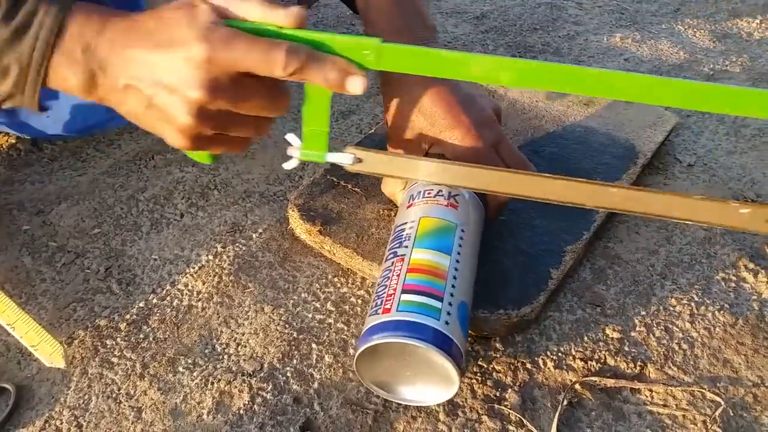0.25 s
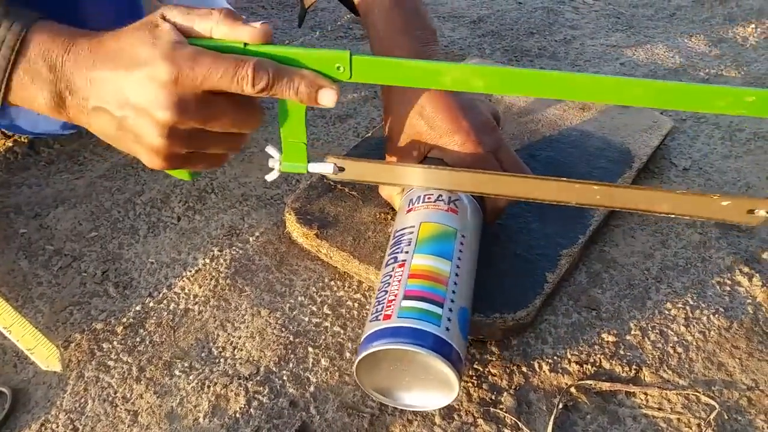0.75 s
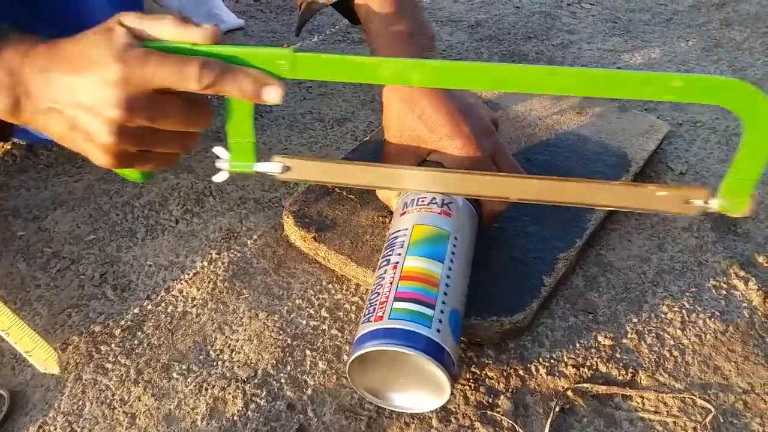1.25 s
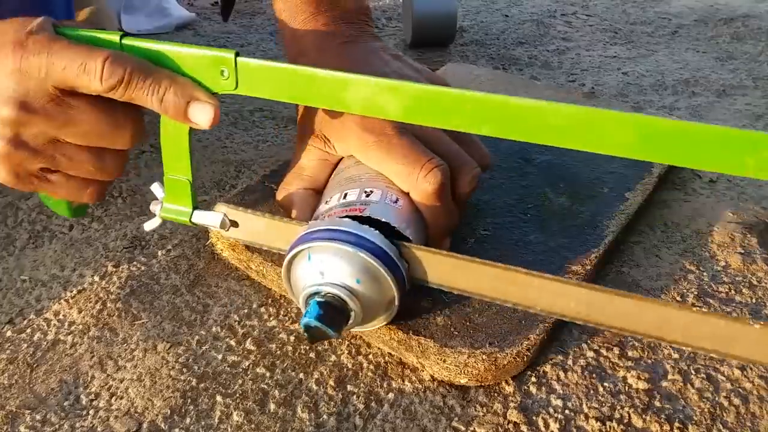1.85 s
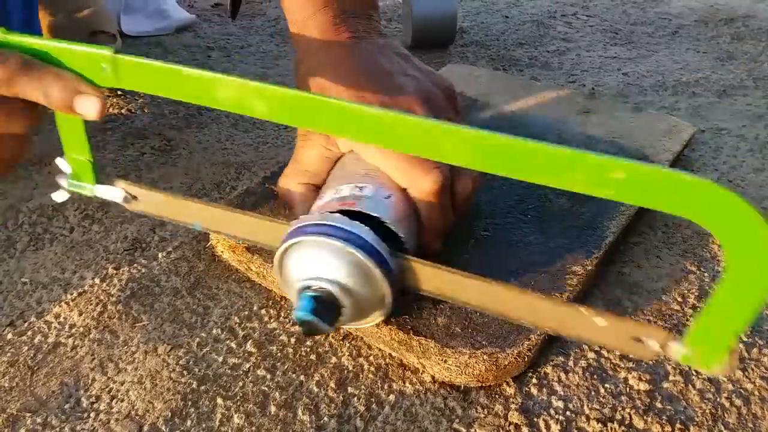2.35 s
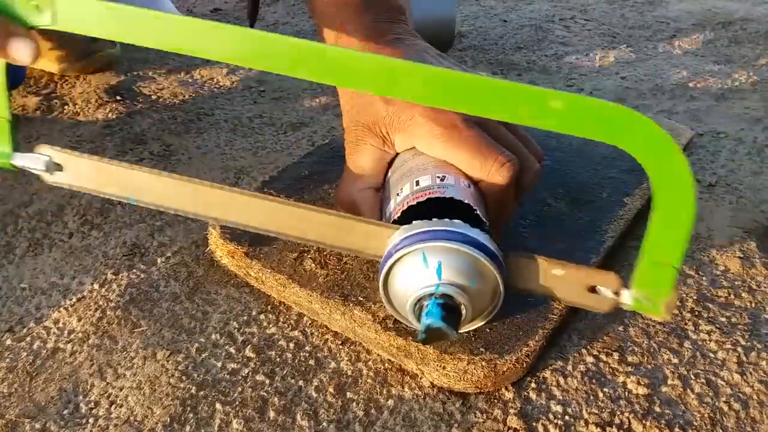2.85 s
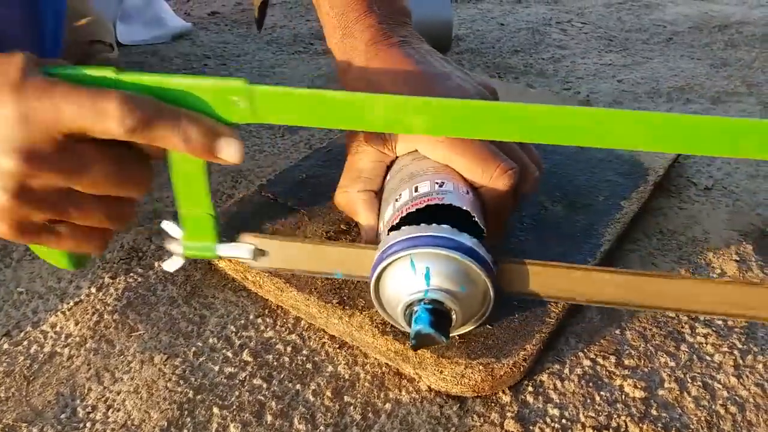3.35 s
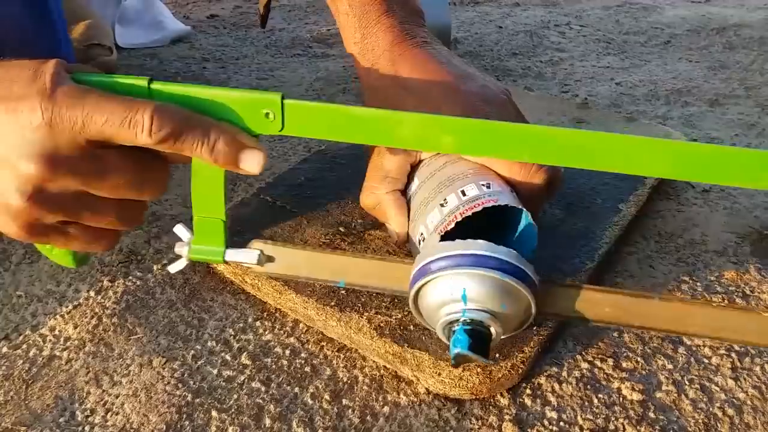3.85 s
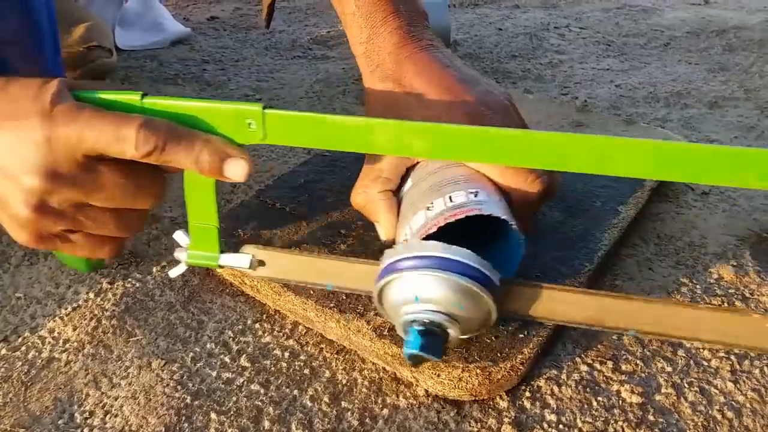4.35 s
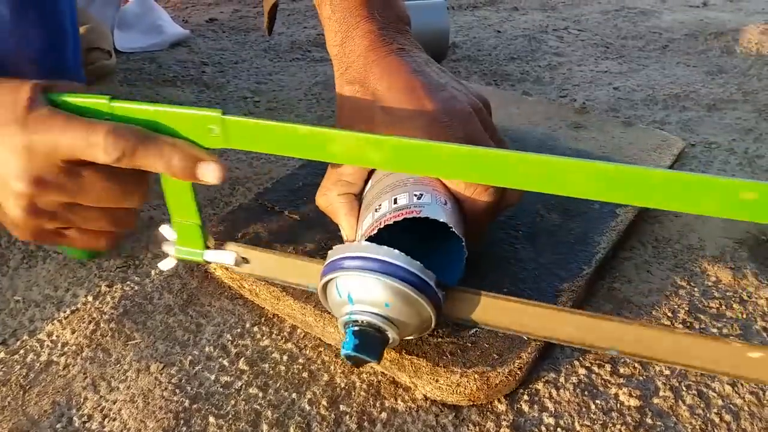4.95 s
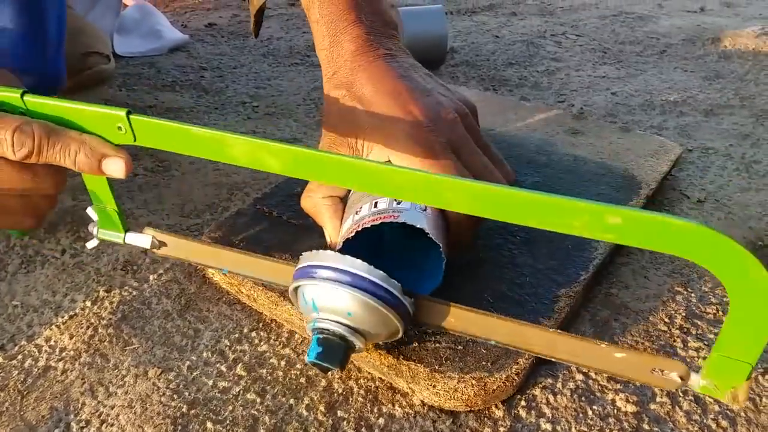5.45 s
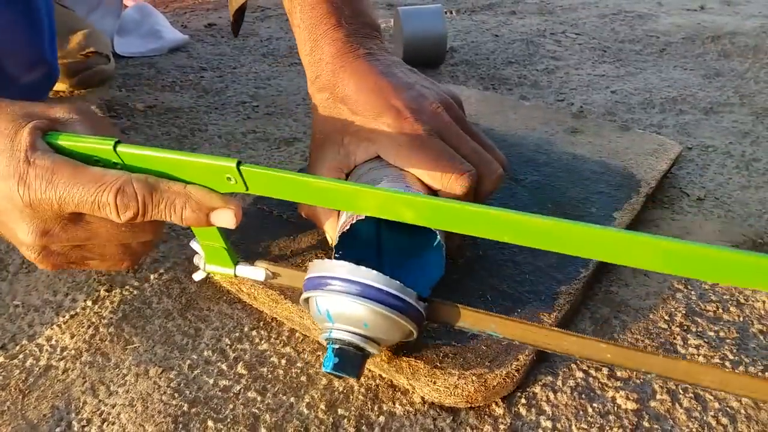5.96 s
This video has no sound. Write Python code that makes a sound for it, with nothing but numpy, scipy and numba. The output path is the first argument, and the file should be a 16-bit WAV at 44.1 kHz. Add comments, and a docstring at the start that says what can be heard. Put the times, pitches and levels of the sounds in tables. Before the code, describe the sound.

A hacksaw rasps back and forth through a thin, empty metal can outdoors, bright scraping turning to louder strokes with a hollow, hooting ring.

```python
"""A hacksaw rasps through an empty aluminium can in quick strokes, a bright scrape ringing a thin shell.
The rasp is noisy tooth force driving the can's resonances: closed, then slit, then gaping. Once it is open,
the air inside hoots at a mostly rising pitch, made by a wavering sine and a resonator that the teeth roughen.
Noise bursts make the knocks of the blade; torn edges crinkle, the right microphone rumbles with overload in
the hardest strokes, and air hushes behind."""
import sys
import numpy as np
from scipy import signal
from scipy.fft import rfft, irfft
from scipy.io import wavfile
from numba import njit

SR = 44100
rng = np.random.default_rng(int(sys.argv[2]) if len(sys.argv) > 2 else 0)


def dump_mix(stems):
    """Bounce the given channels to the path in sys.argv[1] as a 16-bit WAV at rate SR."""
    frames = np.atleast_2d(stems).T  # one column per channel
    limited = np.clip(frames, -1, 1)  # hard clip at full scale
    pcm = np.round(limited * 32767).astype(np.int16)
    wavfile.write(sys.argv[1], SR, pcm)


N = 274302
TIME = np.arange(N) / SR
TAPS = 8192  # length of the shell response before trimming, samples
STROKE_ROOM_S = .34  # each stroke is worked out for this long

# saw strokes in the open cut, levels before the trims of sawing():
# start_s, attack_s, length_s (until it slows), release_t60_s, rasp_db, scrape_db (re rasp),
# hiss_db (re rasp), chatter_db, hoot_db (during the stroke), slowing_hoot_db (as the blade slows)
OPEN_STROKES = [ (1.687, 0.0049, 0.021, 0.23, -59, 6.5, -7, 1.8, -58, -75),
                (1.721, 0.0019, 0.063, 0.039, -32, -7.5, -13, 4, -51.5, -42),
                (1.893, 0.0061, 0.13, 0.073, -29, -6.5, -7.5, 2.7, -39.5, -48),
                (2.102, 0.011, .13, 0.097, -29, -9, -9.5, 1.5, -39, -35),
                (2.298, 0.0018, 0.036, 0.073, -49.5, 0, -8, 3, -48.5, -52),
                (2.356, 0.0048, 0.074, 0.086, -31.5, -4.5, -5, 3.6, -41.5, -41),
                (2.465, 0.0019, 0.014, 0.042, -35.5, -5, -18, 2, -48.5, -50),
                (2.543, 0.01, 0.084, .05, -30.5, -3, -11, 2.8, -36.5, -34),
                (2.688, 0.0068, 0.094, 0.097, -32, -8.5, -4.5, 0.65, -46.5, -36.5),
                (2.838, 0.0051, 0.15, 0.061, -30, -5.5, -7.5, 0.6, -43.5, -31.5),
                (3.078, 0.0099, 0.13, .08, -31.5, -6, -6.5, 1.4, -37.5, -88),
                (3.237, 0.0029, 0.17, 0.084, -30.5, -3.5, -7, 1.7, -42.5, -36.5),
                (3.493, .004, 0.093, 0.12, -29.5, -6, -8.5, 2.1, -40, -39.5),
                (3.635, .015, 0.041, 0.31, -41, -5, -4, 4, -42.5, -37),
                (3.711, .008, .14, 0.07, -27, -8.5, -12.5, 2, -34.5, -32),
                (3.934, 0.0088, .02, 0.055, -40.5, -17, -7, 2.5, -53, -45),
                (3.962, .004, 0.085, 0.052, -30.5, -7, -10.5, 0.93, -54.5, -32.5),
                (4.086, 0.0089, 0.029, 0.1, -35.5, -29.5, -14, 6.1, -35.5, -59),
                (4.157, 0.0024, .14, 0.091, -27.5, -8, -12.5, 1.8, -40.5, -30),
                (4.432, 0.004, 0.07, 0.067, -49.5, -13, -8.5, 2.5, -53, -39),
                (4.467, 0.0058, 0.059, 0.059, -33, -4, -11, 4.6, -36, -35.5),
                (4.682, 0.016, 0.076, 0.077, -38, -18, -19, 6.4, -46, -39),
                (4.896, 0.018, 0.14, 0.11, -32, -13, -8.5, 0.55, -38, -32.5),
                (5.126, 0.036, .045, 0.042, -41.5, -1, -7, 3, -46.5, -38.5),
                (5.187, 0.0093, 0.028, 0.06, -33, 0, -10.5, 2.8, -43, -46),
                (5.228, 0.0042, 0.066, 0.11, -39, -1.5, -10.5, 2.1, -37.5, -30.5),
                (5.511, .006, 0.016, 0.2, -42.5, -1, -10, 1.9, -44, -36),
                (5.552, 0.011, .108, 0.075, -30.5, -10, -6, 1.6, -38.5, -42.5), ]
# the blade knocks or snags: start_s, ring_db (before the trims of knocks()), hiss_db (re ring), cavity_thump_db
KNOCKS = [(0.141, -13.5, 1.5, -73), (.229, -37, -14, -74), (0.915, -10.5, -7, -72),
          (1.131, -28.5, 7.5, -67), (1.216, -16, -5.5, -68), (1.437, -11, -1, -76), (1.58, -15, -6, -75),
          (1.669, -19, -8.5, -57), (1.727, -9, -17, -36.5), (1.778, -14, -12.5, -40), (1.83, -20, -11, -58),
          (1.895, -14, -9.5, -59), (2.079, -20, -8.5, -38.5), (2.102, -12.5, -16.5, -62),
          (2.362, -3.5, -20.5, -53), (2.506, -5, -11.5, -41.5), (3.037, -21, -2.5, -44),
          (3.067, -15, -1, -47), (3.237, -14.5, -3.5, -44.5), (3.451, -7.5, -11, -42),
          (3.494, -20.5, 1.5, -36), (3.656, -11.5, -4, -31), (3.899, -31, -4, -49),
          (3.963, -7.5, -38, -31.5), (4.08, -12.5, -14, -50), (4.351, -26.5, -8, -50),
          (4.38, -33.5, -10, -47), (4.417, -11, -17, -30), (4.563, -14.5, -5, -69), (4.622, -26.5, -4, -59),
          (4.664, -27.5, -10, -62), (4.692, -15.5, -19, -41), (4.743, -21.5, -4, -70),
          (4.854, -37.5, -12, -61), (4.898, -22.5, -15, -58), (5.156, -13, -18.5, -43),
          (5.321, -21, -8.5, -40.5), (5.467, -47.5, -17, -75), (5.517, -16.5, -24, -52),
          (5.846, -35.5, -10.5, -67), (5.949, -53, -13, -79), (5.985, -58, -10, -82),
          (6.04, -58, -10, -83.5), (6.145, -16.5, -11.5, -37), (6.212, -20.5, -10, -52)]
# hardest part of the stroke: middle_s, length_s, rumble_db (before the left and right trims)
HARD_PARTS = [(1.973, 0.094, -48.5), (2.183, 0.097, -45), (2.389, 0.082, -36.5), (2.744, 0.08, -40),
              (2.924, 0.2, -35.5), (3.16, 0.073, -45), (3.347, 0.11, -35.5), (3.781, 0.18, -36),
              (4.229, 0.19, -34), (4.492, 0.045, -45.5), (4.969, 0.19, -46), (5.618, 0.1, -38.5)]


def sawing(strokes, arch_db, scrape_trim_db, rasp_trim_db, hiss_trim_db, whine_db):
    """Stroke after stroke of tooth force rings the shell; returns the sound and the force."""
    hard_scrape_db, hard_whine_db = 3, 10.5  # the hardest part has a stronger scrape and more whine
    hiss_decay = 1.56  # the hiss dies sooner than the rasp: ratio of decay rates
    out, force, hard = np.zeros((2, N)), np.zeros(N), hardness()
    t = np.arange(int(STROKE_ROOM_S * SR)) / SR
    for start_s, attack_s, length_s, t60, db, scrape_db, hiss_db, chatter_db, *_ in strokes:
        hard_now = np.interp(start_s + t, TIME, hard)
        gain = stroke(t, attack_s, length_s, t60, arch_db)
        hz = tooth_rate(t, start_s, length_s)
        push = teeth(hz, chatter_db, whine_db + hard_whine_db * hard_now)
        add(force, start_s, push * gain)
        scrape_gain = gain * undb(scrape_db + scrape_trim_db + hard_scrape_db * hard_now)
        rasp_gain = gain * undb(rasp_trim_db)
        hiss_gain = gain ** hiss_decay * undb(hiss_db + hiss_trim_db)
        for response, part in zip(can_at(start_s), (scrape_gain, rasp_gain, hiss_gain)):
            add(out, start_s, undb(db) * signal.fftconvolve([push * part], response, axes=1))
    return out, force


def teeth(hz, judder_db, whine_db, jitter=.05, judder_hz=100, uneven_db=2.5, catch=0.38, slide=.25,
          grit_db=3, snap_db=-8, burr_db=-9, burr_spread_db=5.5):
    """Force of one stroke: each tooth snaps free and tears a gritty chip; together they whine at the tooth rate."""
    count = len(hz)
    # the thin wall flexes: where it grips harder, the blade slows
    judder = waver(count, judder_hz)
    phase = np.cumsum(np.abs(hz * (1 - jitter * judder))) / SR
    tooth = phase.astype(int)
    tooth_gain = undb(uneven_db * rng.standard_normal(count))[tooth]
    bite = tooth_gain * undb(judder_db * judder)
    # each chip starts hard and eases into a slide; catch is a fraction of the tooth spacing
    grit = rng.standard_normal(count) * undb(grit_db * rng.standard_normal(count))
    chip = (slide + np.exp(-(phase % 1) / catch)) * grit
    snap = np.diff(tooth, prepend=0) * np.sqrt(SR / hz)
    whine = np.sqrt(2) * np.cos(2 * np.pi * phase)
    # burrs crack as the teeth snap free, a few of them much more sharply
    burr = snap * undb(burr_spread_db * np.minimum(rng.exponential(size=count), 3.8))
    centred_snap = snap - np.sqrt(hz / SR)
    cutting = unit(chip) + undb(snap_db) * centred_snap + undb(whine_db) * whine
    return unit(unit(bite * cutting) + undb(burr_db) * unit(burr))


def stroke(t, attack_s, length_s, t60, arch_db):
    """Gain of one stroke: the blade gets going, swells to the middle and slows to rest."""
    arch = undb(-arch_db * (2 * np.minimum(t / length_s, 1) - 1) ** 2)
    release = np.exp(-np.log(1000) * np.maximum(t - length_s, 0) / t60)
    return np.clip(t / attack_s, 0, 1) * arch * release


def tooth_rate(t, start_s, length_s, coast_s=.2, skew=1.45):
    """Teeth passing per second: the blade gathers speed, slows more quickly and coasts down."""
    # fastest rate at which teeth pass the wall in a full stroke: time_s, rate_hz
    full_rate = [(0, 690), (1.5, 717.7), (2.2, 1153), (2.9, 1273), (3.35, 1261), (4.2, 998.6),
                 (4.95, 771.3), (5.6, 771)]
    turn_hz = 471.1  # rate as the blade starts or slows
    full_stroke_s = .13  # shorter strokes never reach full speed
    full_hz = np.interp(start_s + length_s / 2, *np.transpose(full_rate))
    gain_hz = (full_hz - turn_hz) * min(length_s / full_stroke_s, 1)
    arc = np.sin(np.pi * np.minimum(t / length_s, 1) ** skew)
    return (turn_hz + gain_hz * arc) * np.exp(-np.maximum(t - length_s, 0) / coast_s)


def hardness():
    """Rises from 0 to 1 and back over the hardest part of each listed stroke."""
    return sum(swell(middle_s, length_s) for middle_s, length_s, _ in HARD_PARTS)


def swell(middle_s, length_s):
    """A smooth rise to 1 and back."""
    return np.cos(np.pi * np.clip((TIME - middle_s) / length_s, -.5, .5))


def can_at(s):
    """The shell as it rings at time s: closed, slit, then gaping as the top is nearly severed."""
    # radiation of the shell: frequency_hz, left_db, right_db
    closed_colour = [(40, -9.5, -17), (128, -3, -5.5), (285, -10, -9), (487, -3.5, -7.5),
                     (613, -11.5, -11.5), (760, -5, -2.5), (920, -3.5, -12.5), (1360, -11.5, -5.5),
                     (2300, 0.5, 4), (4540, 0, 4.5), (6960, -15, -18), (9100, -13.5, -19),
                     (10900, -1.5, -12), (15700, -14, -13)]
    slit_colour = [(50, -8, -17), (291, -20, -19.5), (520, -19.5, -12.5), (730, -13, -14),
                   (920, -18.5, -15), (1480, -12.5, -12.5), (2390, -10.5, -3.5), (3070, -10.5, 2),
                   (4020, -22.5, 2.5), (4990, -20.5, -8), (6060, -23.5, -19), (7450, -22, -23.5),
                   (10800, -18.5, -19.5), (16000, -22, -25)]
    gaping_colour = [(50.33, -27, -23.5), (316, -21.5, -17), (564, -11.5, -8), (800, -9, -8.5),
                     (1000, -23.5, -11), (1510, -14, -13.5), (2370, -16, -10), (3065, -16, -6.5),
                     (4060, -21.5, 2), (5040, -22.5, -9.5), (5260, -19, -15), (7600, -25.5, -28.5),
                     (8450, -22.5, -22.5), (16000, -24, -30.5)]
    # shell resonances: frequency_hz (before detuning), width_hz, strength_db
    closed_modes = [(690, 54, 5), (1048, 31, 5.5), (1236, 72, 3.5), (1400, 67, 3), (1982, 87, 13),
                    (2576, 58, 6.5), (3020, 24, 3.5), (3710, 310, 2), (3680, 190, -12), (7680, 350, 2)]
    slit_modes = [(1181, 110, 1), (1816, 110, 2.5), (2395, 8.1, 3), (2667, 13, 9.5), (3234, 130, -5),
                  (3730, 150, 0), (4104, 76, 1), (4680, 330, 4.5), (7090, 340, 0.5)]
    gaping_modes = [(1214, 81, -6), (1453, 60, -0.5), (1780, 56, -5.5), (2460, 97, -4), (2630, 24, 6.5),
                    (2765, 15, 5.5), (3566, 83, -0.5), (3680, 540, -4), (4480, 210, -5), (4830, 55, -3.5),
                    (7110, 59, 3.5)]
    slit_s, gaping_s = 1.635, 3.92  # the wall is slit through, then the top gapes
    if s < slit_s:
        return shell(closed_colour, closed_modes, detune=0.0089, ring_db=-1.0, ring_t60=0.073)
    if s < gaping_s:
        return shell(slit_colour, slit_modes, detune=0.0086, ring_db=-14, ring_t60=0.25)
    return shell(gaping_colour, gaping_modes, detune=0.024, ring_db=-10.5, ring_t60=0.14)


def shell(colour, modes, detune, ring_db, ring_t60, scatter_db=1, scatter_t60=0.029):
    """Stereo response of the can for one blade position, as (scrape, rasp, hiss) from low to high band."""
    hz, t = np.arange(TAPS // 2 + 1) * SR / TAPS, np.arange(TAPS) / SR
    points_hz, *ears_db = np.transpose(colour)
    # the blade presses on the wall somewhere else each time, which shifts the resonances
    peaks = 1
    for mode_hz, width_hz, db in modes:
        centre_hz = mode_hz * (1 + detune * rng.standard_normal())
        peaks = peaks + undb(db) ** 2 * 3 / (1 + (2 * (hz - centre_hz) / width_hz) ** 2)
    gain = np.array([spectrum(hz, points_hz, db) for db in ears_db]) * np.sqrt(peaks)
    # folding the cepstrum gives minimum phase, so the resonances start at once
    fold = np.r_[1, np.full(TAPS // 2 - 1, 2), np.zeros(TAPS // 2)]
    cepstrum = irfft(np.log(gain)) * fold
    fade = sum(undb(db) * unit(np.exp(-np.log(1000) * t / t60))
               for db, t60 in [(scatter_db, scatter_t60), (ring_db, ring_t60)])
    diffuse = rfft(unit(rng.standard_normal((2, TAPS)) * fade)) / np.sqrt(TAPS)
    # the direct sound reaches the left side four samples first
    direct = rfft([t == 0, t == 4 / SR])
    # wall modes crowd together in the treble and reach each side differently
    share = np.clip(0.99 * hz ** 2 / (hz ** 2 + 2300 ** 2), 0, 1)
    response = np.exp(rfft(cepstrum)) * (np.sqrt(1 - share) * direct + np.sqrt(share) * diffuse)
    above_low, above_high = (1 - 1 / (1 + (hz / edge_hz) ** 10) for edge_hz in (1500, 5500))
    parts = [irfft(response * w) for w in (1 - above_low, above_low - above_high, above_high)]
    # unit energy in the mono mix, then the last quarter is trimmed off
    return [p[:, :TAPS * 3 // 4] / np.linalg.norm(p.mean(axis=0)) for p in parts]


def cavity(force, width_hz=40, rough_db=-6, wander=0.02413, wander_hz=25, thump_width_hz=22,
           skirt_hz=160, hoot_db=-1, pan_db=-1):
    """The air in the can hoots through the slit; the flexing slit bends the note, teeth roughen it, blows thump it."""
    # resonance of the air in the opened can: time_s, pitch_hz
    cavity_pitch = [(1.65, 392), (2.05, 390), (2.6, 425), (2.9, 409.1), (3.65, 437.1), (4.05, 461),
                    (4.5, 467.3), (5.0, 463), (5.3, 480), (6.2, 476.7)]
    hz = np.interp(TIME, *np.transpose(cavity_pitch))
    bent_hz = hz * (1 + wander * waver(N, wander_hz))
    note = np.sqrt(2) * np.sin(2 * np.pi * np.cumsum(bent_hz) / SR)
    hoot = note + undb(rough_db) * unit(resonate(force, hz, float(width_hz)))
    blows = np.zeros(N)
    for start_s, _, _, thump_db in KNOCKS:
        add(blows, start_s, np.array([undb(thump_db) * SR / (np.pi * thump_width_hz)]))
    thumps = resonate(resonate(blows, hz, float(thump_width_hz)), hz, float(skirt_hz))
    return (undb(hoot_db) * hoot * hoot_drive() + thumps) * undb([[pan_db / 2], [-pan_db / 2]])


def hoot_drive(attack_s=0.0076, t60=0.15, swell_s=0.015, swell_lag_s=0.0048, swell_t60=0.12,
               flutter_db=2.5, flutter_hz=45):
    """Each stroke drives the cavity, with its loudest part ducked, and once more as the blade slows."""
    duck_db = -7  # the recorder's limiter ducks the hoot in the loudest part of a stroke
    during, after = np.zeros(N), np.zeros(N)
    t = np.arange(int(STROKE_ROOM_S * SR)) / SR
    for start_s, _, length_s, *_, hoot_db, slowing_db in OPEN_STROKES:
        add(during, start_s, undb(hoot_db) * stroke(t, attack_s, length_s, t60, 0))
        swell_start_s = start_s + length_s + swell_lag_s - swell_s
        add(after, swell_start_s, undb(slowing_db) * stroke(t, swell_s, swell_s, swell_t60, 0))
    duck_and_flutter = undb(duck_db * hardness() + flutter_db * waver(N, flutter_hz))
    return np.hypot(during * duck_and_flutter, after)


@njit
def resonate(x, hz, width):
    """State-variable band-pass with a moving centre."""
    y, band_state, low_state = np.empty(len(x)), 0., 0.
    for i in range(len(x)):
        g, k = np.tan(np.pi * hz[i] / SR), width / hz[i]
        v = (band_state + g * (x[i] + 1e-18 - low_state)) / (1 + g * (g + k))
        band_state, low_state, y[i] = 2 * v - band_state, low_state + 2 * g * v, k * v
    return y


def knocks(contact_s=0.0052, tick_s=0.00079, knock_trim_db=5, tick_trim_db=1, low_db=-9):
    """The blade jolts in the cut, as at its turns: a sharp tick, and a short crunch that rings the shell."""
    out, t = np.zeros((2, N)), np.arange(TAPS // 4) / SR
    for start_s, db, hiss_db, _ in KNOCKS:
        scrape, rasp, hiss = can_at(start_s)
        ring = undb(low_db) * scrape + rasp
        tick = undb(hiss_db + tick_trim_db) * hiss
        for response, decay_s in [(ring, contact_s), (tick, tick_s)]:
            crunch = rng.standard_normal(len(t)) * np.exp(-t / decay_s)
            hit = signal.fftconvolve([crunch / np.linalg.norm(crunch)], response, axes=1)
            add(out, start_s, undb(db + knock_trim_db) * hit)
    return out


def crinkles(busy_db=-25, spread_db=4, hiss_db=-9, start_s=2.25, end_s=4.75, count=50):
    """Torn edges of the wall crinkle while the blade works them: randomly timed clicks of the gaping shell."""
    out = np.zeros((2, N))
    scrape, rasp, hiss = can_at(end_s)
    click = rasp + undb(hiss_db) * (scrape + hiss)
    for when, size in rng.random((count, 2)):
        level_db = busy_db + spread_db * (2 * size - 0.5)
        add(out, start_s + when * (end_s - start_s), undb(level_db) * click)
    return out


def rumble(low_hz=62, high_hz=275, left_db=-20, right_db=5.0):
    """Low rough rumble of filtered noise where strokes are loudest, nearly all on the right:
    the right microphone overloads."""
    noise = band(rng.standard_normal((2, N)), low_hz, "high", order=3)
    noise = unit(band(noise, high_hz, "low", order=2))
    swells = sum(undb(db) * swell(middle_s, length_s) ** 2 for middle_s, length_s, db in HARD_PARTS)
    return noise * swells * undb([[left_db], [right_db]])


def air(level_db=-72):
    """Faint outdoor hush: steady noise shaped by a falling spectrum."""
    # tilt of the hush: frequency_hz, relative_db
    hush_curve = [(18, -36), (30, -10), (157, -5), (273, -19), (1040, -24.5), (1960, -25.5), (3220, -31.5),
                  (3870, -32), (5170, -39), (16000, -56)]
    gain = spectrum(np.arange(N // 2 + 1) * SR / N, *np.transpose(hush_curve))
    return unit(irfft(rfft(rng.standard_normal((2, N))) * gain, N)) * undb(level_db)


def waver(count, hz):
    """Smooth random motion, mostly slower than hz, of spread 1."""
    # the first TAPS samples let the filter settle
    return unit(band(rng.standard_normal(count + TAPS), hz, "low", order=2)[TAPS:])


def undb(db):
    """Decibels to gain."""
    return 10 ** (np.asarray(db) / 20)


def unit(x):
    """Scale to rms 1."""
    return x / np.sqrt(np.mean(x ** 2))


def band(x, hz, kind, order=4):
    """Butterworth filter."""
    return signal.sosfilt(signal.butter(order, hz, kind, fs=SR, output="sos"), x)


def spectrum(hz, points_hz, db):
    """Gain at each frequency, straight lines on a log axis."""
    return undb(np.interp(np.log(hz + 1), np.log(points_hz), db))


def add(out, s, x):
    """Mix x into out from time s on."""
    i = max(int(s * SR), 0)
    out[..., i:i + x.shape[-1]] += x[..., :max(N - i, 0)]


def scene():
    """The closed can, then the opened one with its hoot, over knocks, crinkles, rumble and hush."""
    # strokes on the closed can, levels before the trims below: start_s, attack_s, length_s (until it slows),
    # release_t60_s, rasp_db, scrape_db (re rasp), hiss_db (re rasp), chatter_db
    closed_strokes = [ (0.0, 0.0067, 0.16, 0.29, -45, 3, -2, -0.5),
                      (.226, 0.0043, 0.11, 0.15, -44, 2, -4.5, -1.5),
                      (.47, 0.13, 0.11, .1, -73.5, 6, -3, 3.5), (.57, 0.078, 0.13, 0.18, -61.5, 4, 1, 3),
                      (.768, 0.044, 0.16, 0.3, -41.5, 4.5, -1, -2.5),
                      (.965, 0.018, 0.13, 0.21, -42.5, 1.5, -2, -0.5),
                      (1.168, 0.016, 0.037, 0.083, -51, 4, -1, -8),
                      (1.193, 0.033, .08, 0.27, -35, 8, -3, -1), (1.28, 0.011, .058, 0.13, -36.5, 5, -3, 0),
                      (1.402, 0.0072, 0.028, 0.07, -45, 2, -3.5, 4.5),
                      (1.434, 0.02, .17, .1, -35, 4, -3, 6), ]
    # arch_db is what a stroke loses at its ends against its middle
    closed, _ = sawing(closed_strokes, arch_db=2, scrape_trim_db=-4, rasp_trim_db=-4.04,
                       hiss_trim_db=0.2, whine_db=-40)
    opened, force = sawing(OPEN_STROKES, arch_db=0.6, scrape_trim_db=-2.5, rasp_trim_db=0.2,
                           hiss_trim_db=0.5, whine_db=-35)
    return closed + opened + cavity(force) + knocks() + crinkles() + rumble() + air()


def record(dry, ceiling=0.17, low_cut_hz=50, top_hz=16000):
    """The phone rounds the loudest peaks, thins the deep bass and cuts the top."""
    rounded = ceiling * np.tanh(dry / ceiling)
    thinned = band(rounded, low_cut_hz, "high", order=3)
    return signal.sosfilt(signal.ellip(10, .2, 70, top_hz, fs=SR, output="sos"), thinned)


dry = scene()
out = record(dry)
dump_mix(out)
```